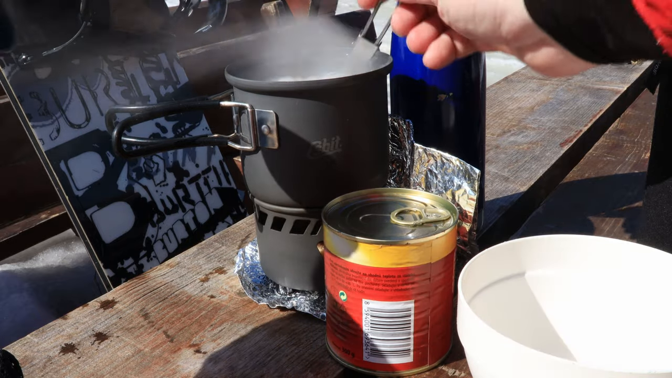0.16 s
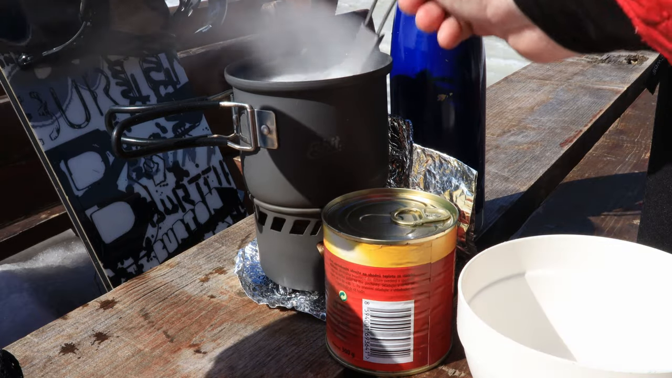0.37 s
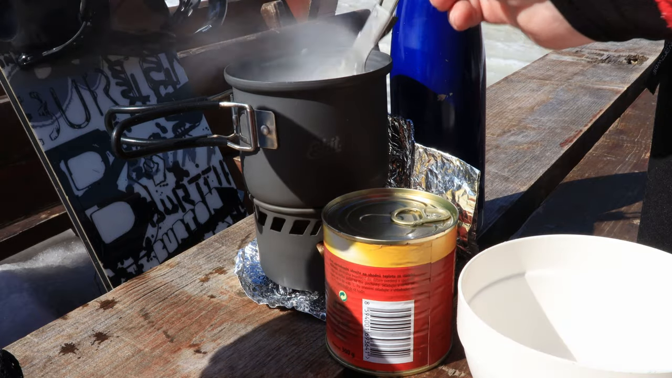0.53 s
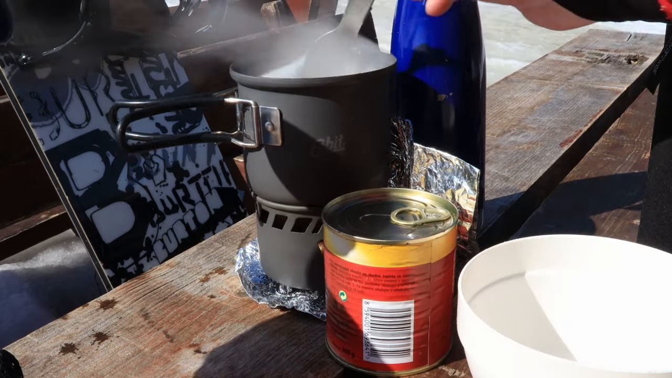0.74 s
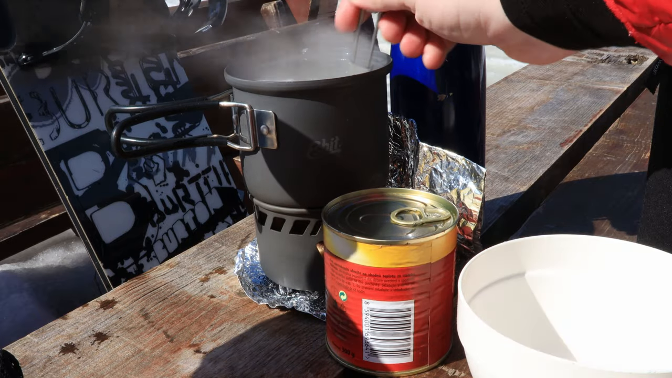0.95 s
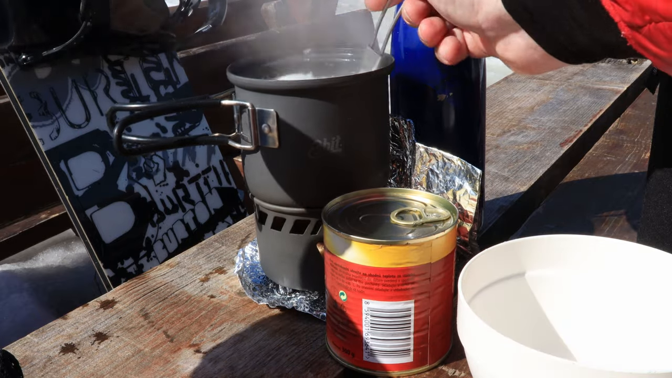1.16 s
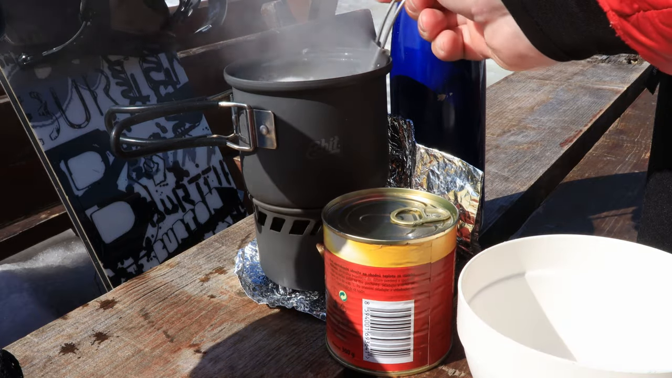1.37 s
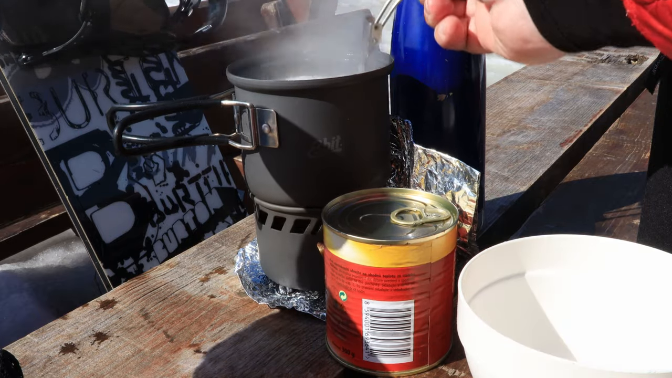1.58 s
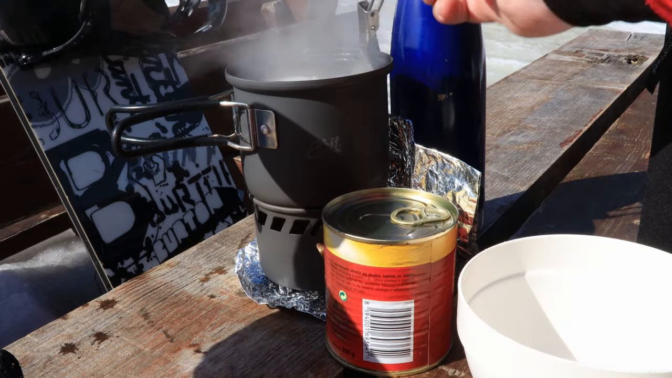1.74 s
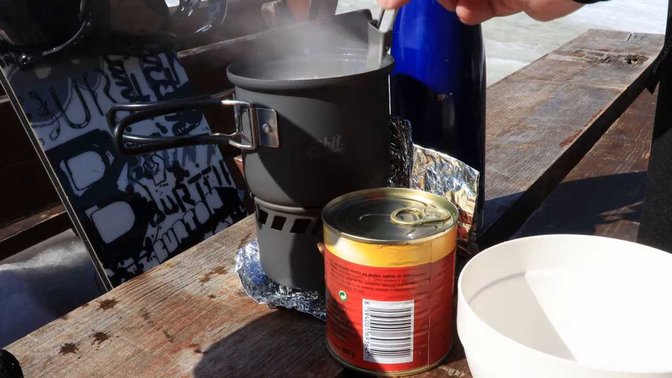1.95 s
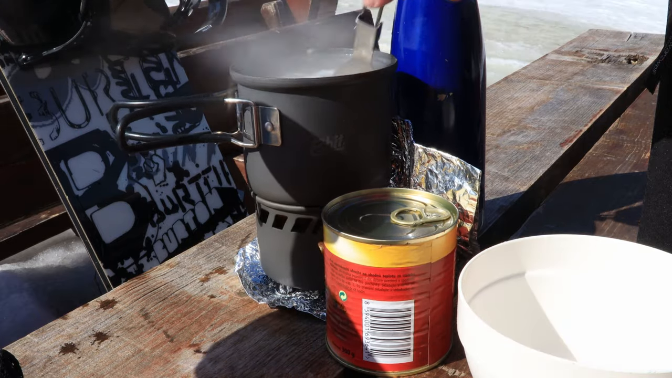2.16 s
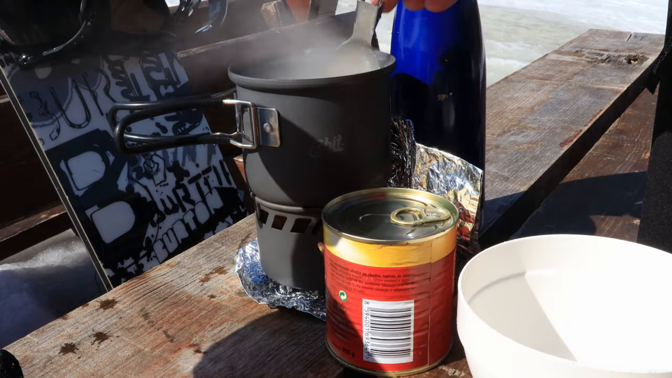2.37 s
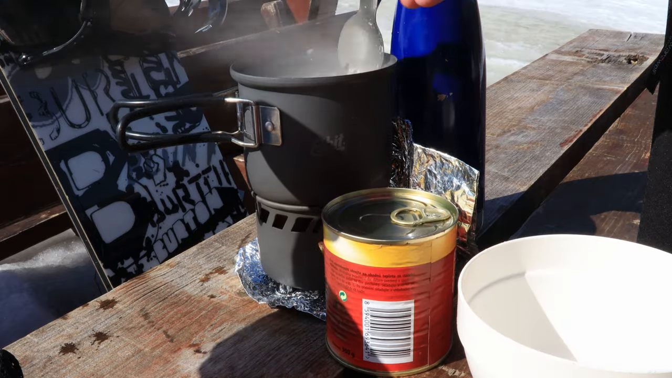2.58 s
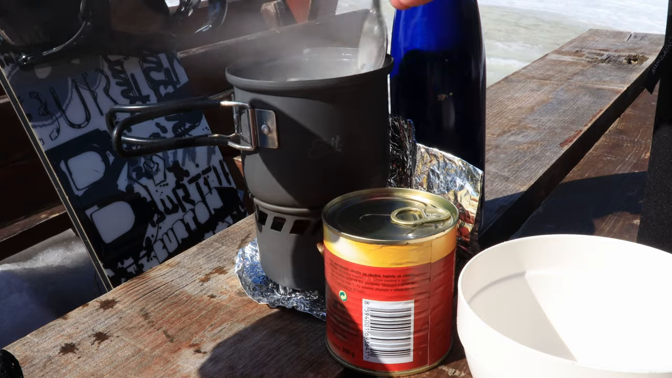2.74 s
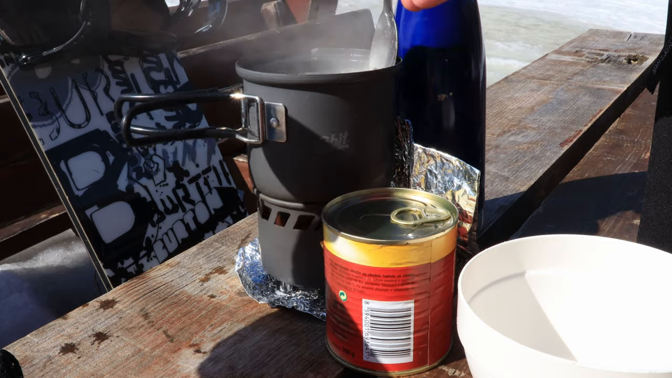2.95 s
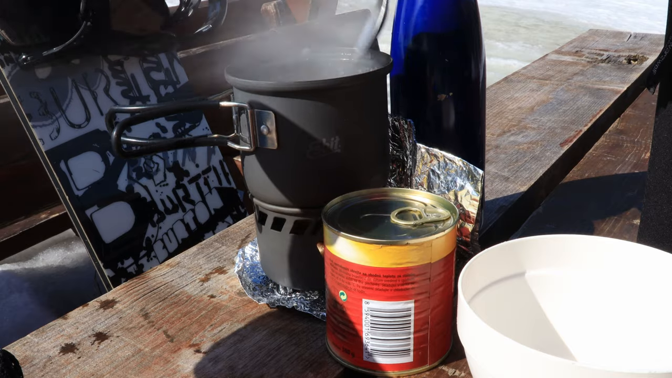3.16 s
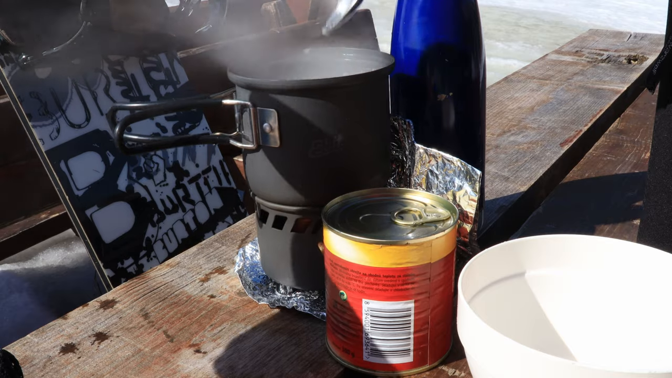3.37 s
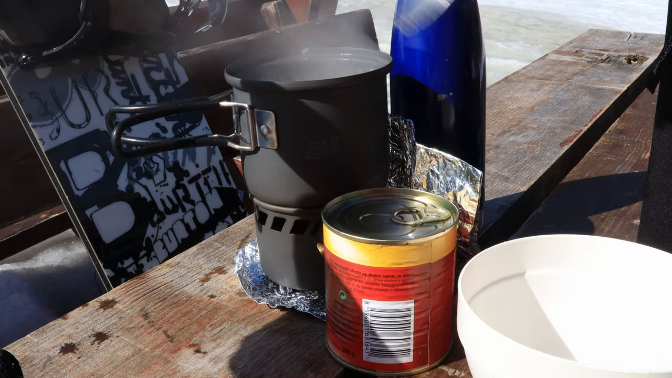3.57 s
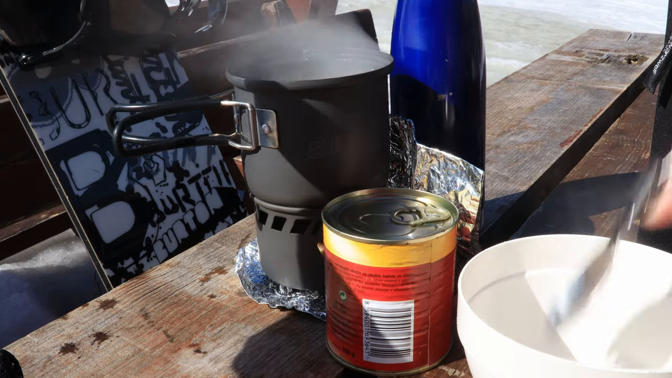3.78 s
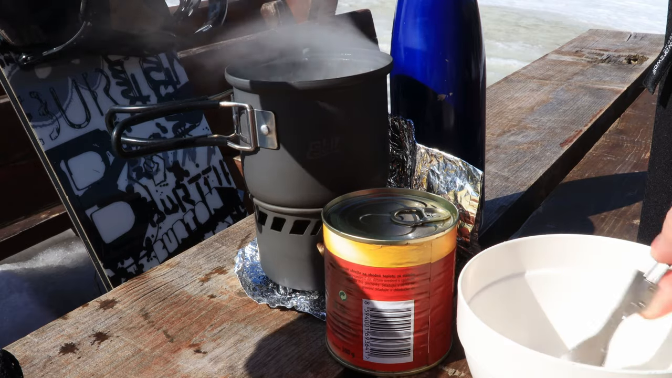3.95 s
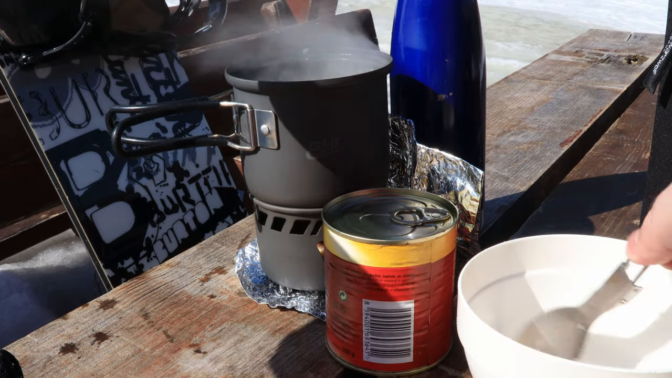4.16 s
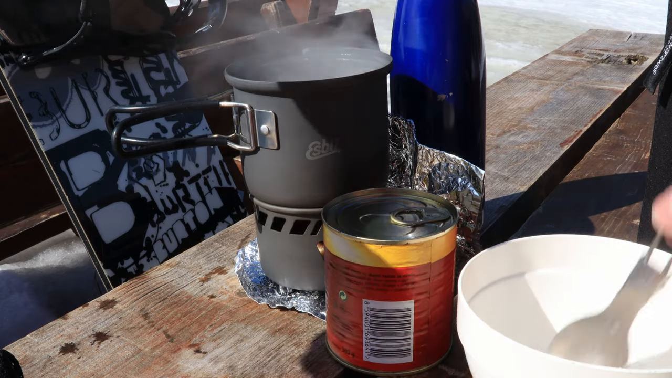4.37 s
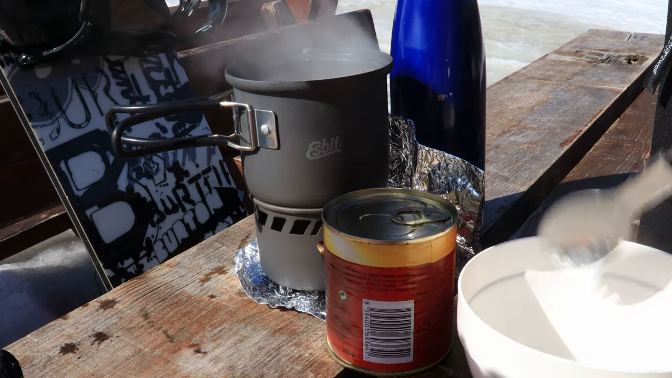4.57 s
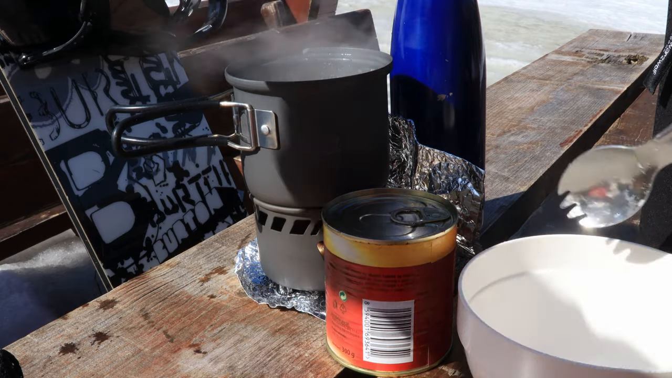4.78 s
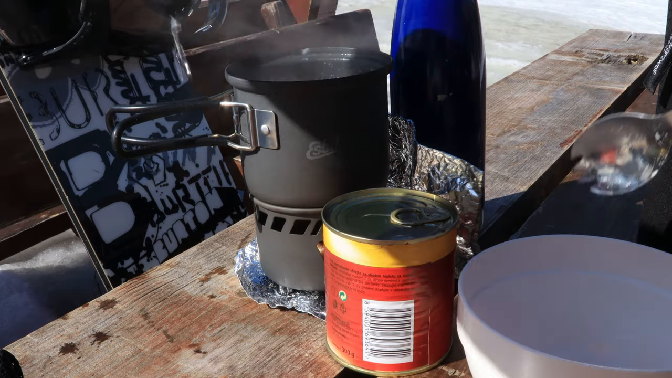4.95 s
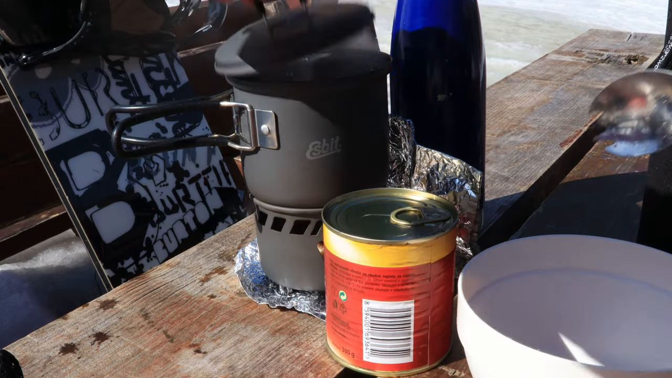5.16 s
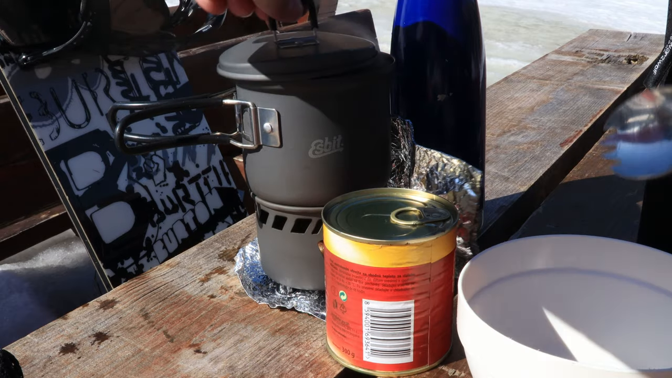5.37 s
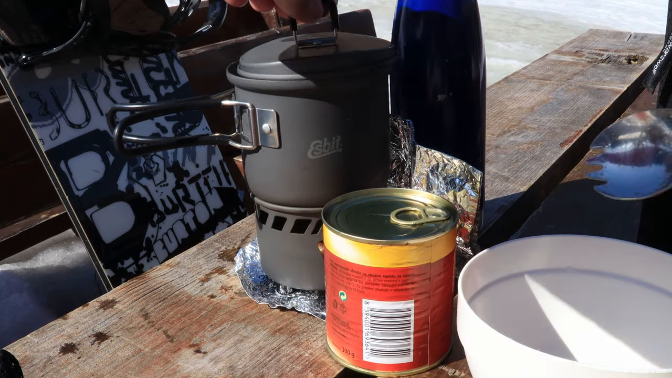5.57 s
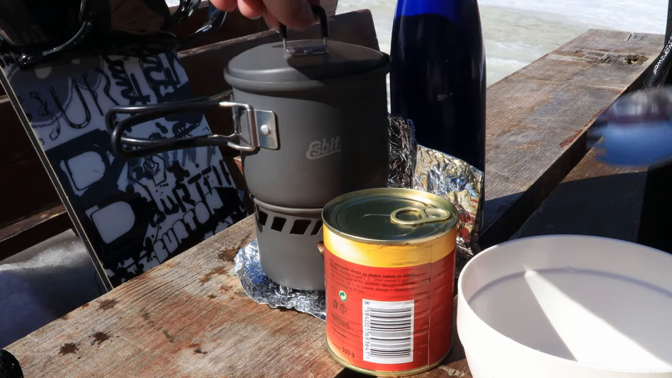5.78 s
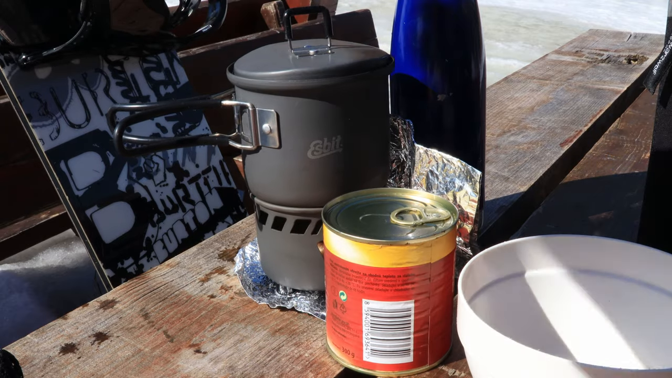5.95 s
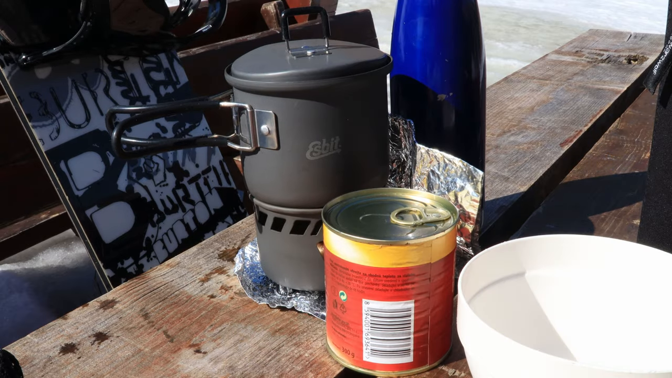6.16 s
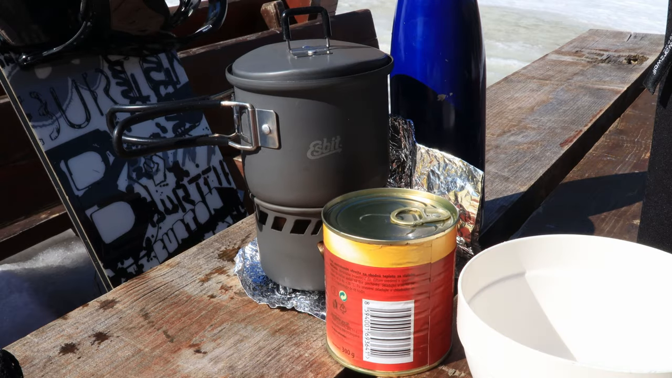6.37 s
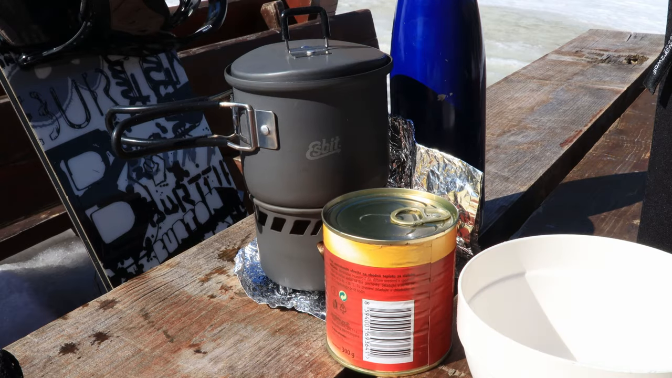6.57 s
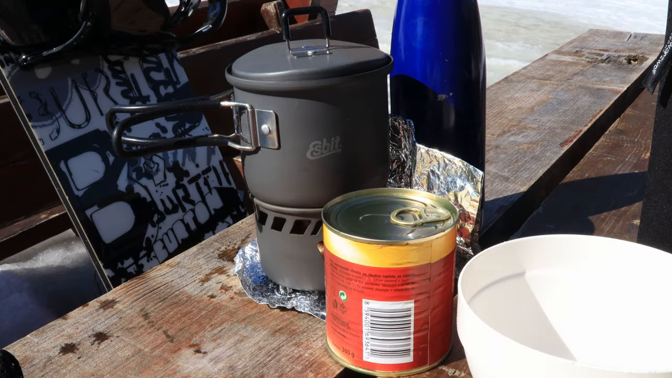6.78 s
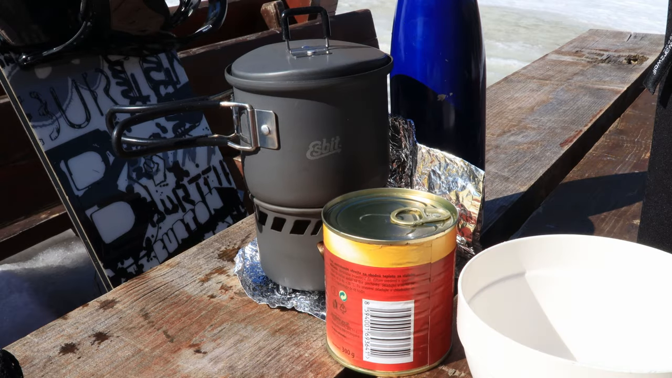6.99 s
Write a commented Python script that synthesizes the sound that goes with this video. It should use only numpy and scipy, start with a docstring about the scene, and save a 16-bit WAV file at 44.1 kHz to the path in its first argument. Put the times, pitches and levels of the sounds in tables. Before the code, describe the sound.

A spoon taps and scrapes in a metal camp pot over a fluttering stove, knocks a plastic bowl, then a metal lid clatters on.

```python
"""A camp stove flutters under a metal pot outdoors while a spoon taps, judders and scrapes round its wall.
The spoon knocks in a plastic bowl; then a metal lid clatters onto the rim, slides and settles.
Gusts hiss past and buffet the microphone and a nylon sleeve swishes, all close to a stereo camera.
Contacts ring banks of decaying modes; friction drives the same modes with rough noise or slips;
flame, air and cloth are shaped noise. Levels in dB are relative."""
import sys
import numpy as np
from scipy import signal
from scipy.fft import rfft, irfft, next_fast_len
from scipy.io import wavfile
from scipy.ndimage import map_coordinates

SR = 44100
rng = np.random.default_rng(int(sys.argv[2]) if len(sys.argv) > 2 else 0)


def digitize_waveform(pressure):
    """Quantize a signal to 16-bit integers and store it at the path in sys.argv[1].

    Rows of a 2-D input are taken as channels; values are limited to [-1, 1].
    """
    field = np.atleast_2d(pressure).T
    bounded = np.clip(field, -1, 1)
    quanta = np.round(bounded * 32767).astype(np.int16)
    wavfile.write(sys.argv[1], SR, quanta)


N = 309702
TIME_S = np.arange(N) / SR

# flame strength: time_s, rumble_db, flutter_db
FLAME_LEVELS = [(0.0, -53.5, -45), (0.81, -73.5, -68.5), (0.87, -82, -60), (1.11, -70, -64),
                (1.67, -73, -51.5), (2.29, -54.5, -51), (2.52, -68.5, -59), (3.9, -63.5, -65.5),
                (3.98, -57, -50), (4.19, -102, -61.5), (4.34, -50, -55), (4.44, -72.5, -63),
                (4.81, -52, -62.5), (4.91, -75, -77), (5.14, -58, -45), (5.2, -64.5, -68),
                (5.93, -53, -54.5), (6.16, -76, -74.5), (7.01, -51, -54.5)]
# broadband scratch spectrum: freq_hz, gain_db
SCRATCH_SPECTRUM = [(100, -1), (300, 6), (600, -2), (1500, 7), (4500, 2.5), (7000, 1), (11500, -5),
                    (13500, -10.5), (16000, -26)]
# pot wall, deadened by food and the pressing spoon: mode_hz, level_db, t60_s
WALL_MODES = [(298, -21, 0.19), (430, -19, 0.045), (672, -9.5, 0.028), (1090, -9, 0.0052),
              (1380, -9, 0.021), (1750, 8, 0.0075), (2104, 9, 0.0064), (2376, 9, 0.0062),
              (2860, 4.5, 0.0076), (3455, 9, 0.0069), (4670, -9, 0.009), (4840, 4.5, 0.0099),
              (6550, 1.5, 0.0084), (8240, -2.5, 0.014), (9260, -4, 0.024), (11350, -3.5, 0.019)]
# lid plate: mode_hz, level_db, t60_s
LID_MODES = [(353, -20.5, 0.11), (725, -13, 0.044), (1154, -10.5, 0.035), (1270, -6.5, 0.036),
             (1480, -7, 0.027), (1732, -7, 0.017), (2450, -8.5, 0.05), (2630, -8, 0.039),
             (3060, -1.5, 0.012), (3344, 3, 0.081), (3460, -3, 0.053), (3680, -10.5, 0.035),
             (3920, -9.5, 0.099), (4380, -9.5, 0.1), (4820, -10.5, 0.09), (7370, -20, 0.03),
             (6900, -14, 0.039), (7850, -12, 0.035), (8900, -19.5, .035), (9330, -15, 0.047),
             (9960, -17, 0.062), (10040, -14, 0.032), (11190, -17, 0.05), (11700, -15, 0.036),
             (12500, -20, 0.04)]
# lid radiation, three clusters with gaps between: freq_hz, gain_db
LID_RADIATION = [(450, 2.5), (800, -3.5), (1200, 0), (1750, 2), (2150, -3), (2600, -1), (4900, -0.5),
                 (5500, 1), (7000, -1), (10000, 0), (13000, -3.5)]


def amp(db):
    """Decibels to gain."""
    return 10 ** (np.asarray(db) / 20)


def unit(x):
    """Scale to rms 1."""
    return x / np.sqrt(np.mean(x ** 2) + 1e-20)


def blow_unit(x):
    """Scale so that all the energy, packed into 10 ms, has rms 1."""
    return x / np.sqrt(np.sum(x ** 2) / (SR / 100))


def along(points, hz):
    """Interpolate (Hz, value) points on a log frequency axis."""
    f, v = np.transpose(points)
    return np.interp(np.log(hz + 1), np.log(f + 1), v)


def curves(rows):
    """One value per sample for each column after the time."""
    s, *cols = np.transpose(rows)
    return [np.interp(TIME_S, s, c) for c in cols]


def wobble(rate):
    """A smooth random curve, rate knots a second."""
    knots = rng.standard_normal(int(N * rate / SR) + 4)
    return map_coordinates(knots, [np.arange(N) * rate / SR])


def waver(rate):
    """A smooth random curve without rare extremes."""
    return np.tanh(wobble(rate))


def filtered(x, response):
    """Apply a complex response of frequency."""
    n = x.shape[-1]
    m = next_fast_len(n + SR // 4)
    return irfft(rfft(x, m) * response(np.fft.rfftfreq(m, 1 / SR)), m)[..., :n]


def coloured(x, points, size=4096):
    """Causal minimum-phase filter with the gain of (Hz, dB) points."""
    cepstrum = irfft(np.log(amp(along(points, np.fft.rfftfreq(size, 1 / SR)))))
    cepstrum[1:size // 2] *= 2
    cepstrum[size // 2 + 1:] = 0
    impulse = irfft(np.exp(rfft(cepstrum)))
    return signal.fftconvolve(x, impulse)[:len(x)]


def noise(spectrum, size=N):
    """Coloured noise of rms 1."""
    return unit(filtered(rng.standard_normal(size), lambda hz: amp(along(spectrum, hz))))


def add(track, s, x):
    """Mix x into the track from time s."""
    i = max(round(s * SR), 0)
    track[i:i + len(x)] += x[:max(N - i, 0)]


def placed(x, image, echo_s, diffuse_db):
    """Stereo paths: direct with a phase lead, an opposed echo off the nearest tin, diffuse table scatter."""
    # thrown back by table and tins: freq_hz, gain_db
    scatter_spectrum = [(100, -18), (700, 4.5), (2000, 12), (5000, -4), (11500, -7), (16000, 6.5)]
    t = np.arange(SR // 10) / SR
    envelope = amp(-60 * t / 0.061) * (1 - np.exp(-t / 0.00071))
    scatter = np.array([blow_unit(noise(scatter_spectrum, size=len(t)) * envelope) for _ in range(2)])
    scatter /= np.linalg.norm(scatter[0])
    diffuse = signal.fftconvolve(x[None], scatter, axes=1)[:, :N]
    ports = np.array([[1], [-1]])

    def paths(hz):
        direct_db, echo_db, lead = [along(np.array(image)[:, [0, k]], hz) for k in range(1, 4)]
        direct = amp(direct_db) * np.exp(.5j * ports * lead)
        echo = ports * amp(echo_db) * np.exp(-2j * np.pi * hz * echo_s)
        return direct + echo
    return filtered(x, paths) + amp(diffuse_db) * diffuse


def surround(spectrum):
    """Noise from all around: alike in the bass, opposed in the treble."""
    # freq_hz, left_right_correlation
    likeness = [(100, 0.76), (300, 0.88), (640, 0.88), (1400, 0.42), (3100, -0.47), (6800, -0.76),
                (15000, -0.71)]

    def turn(hz):
        return np.arccos(np.clip(along(likeness, hz), -1, 1)) / 2
    mid = filtered(noise(spectrum), lambda hz: np.cos(turn(hz)))
    side = filtered(noise(spectrum), lambda hz: np.sin(turn(hz)))
    return unit(np.array([mid + side, mid - side]))


def ring(modes, grip=10, scatter_db=3, detune=0):
    """Struck modes; grip (t60 s) shortens them all, the contact point detunes the most damped."""
    t = np.arange(SR // 2) / SR
    hz, db, t60 = np.transpose(modes)[:, :, None]
    sign = (-1) ** np.arange(len(db))[:, None]
    strength = amp(db + scatter_db * rng.standard_normal(db.shape)) * sign
    hz = hz * (1 + detune * t60.min() / t60 * rng.standard_normal(hz.shape))
    decay = amp(-60 * t / t60 - 60 * t / grip)
    return blow_unit(np.sum(strength * decay * np.sin(2 * np.pi * hz * t), axis=0))


def crack(t60):
    """Countless weak modes, heard as a decaying burst of noise."""
    t = np.arange(SR // 2) / SR
    return blow_unit(noise(SCRATCH_SPECTRUM, size=len(t)) * amp(-60 * t / t60))


def snap():
    """The single sharp pulse of metal meeting metal."""
    # contact pulse: freq_hz, gain_db
    pulse_spectrum = [(150, -14), (700, -14), (1500, 8.5), (3000, 6.5), (6500, 5.5), (11000, -8),
                      (15000, -23.5)]
    return blow_unit(coloured(signal.unit_impulse(SR // 2), pulse_spectrum))


def contact(x, thud_db, clink_db, sparkle_db, hollow_db=0):
    """Place and hardness of a contact weight the modes; small objects radiate little bass."""
    return coloured(x, [(60, thud_db - 25.5), (280, thud_db), (950, thud_db), (1450, hollow_db),
                        (2500, 0.0032), (3500, clink_db), (6500, clink_db), (9000, sparkle_db)])


def grit(rough_db):
    """Friction force: noise in tiny clumps."""
    return unit(rng.standard_normal(N) * amp(rough_db * 2 * waver(350)))


def slipping(per_s, scatter_db):
    """Friction force: separate slips at an uneven rate."""
    turns = np.floor(np.cumsum(per_s * np.exp(.35 * wobble(90))) / SR)
    return unit(np.diff(turns, prepend=0) * amp(scatter_db * waver(120)))


def rubbed(force, modes, grip, hiss_db):
    """Friction hisses and rings an object's modes; their mix drifts as the contact travels."""
    here, there = [unit(signal.fftconvolve(force, ring(modes, grip, detune=.02))[:N]) for _ in range(2)]
    travel = wobble(15)
    hiss = unit(coloured(force, SCRATCH_SPECTRUM))
    return np.cos(travel) * here + np.sin(travel) * there + amp(hiss_db) * hiss


def stroke(start, length, attack_s, release_s, swell_db):
    """Gain of one sliding stroke: it grips, bows by swell_db about its middle and lets go."""
    t = TIME_S - start
    contact_share = np.clip(np.minimum(t / attack_s, (length - t) / release_s), 0, 1)
    return contact_share * amp(-swell_db * np.clip(2 * t / length - 1, -1, 1) ** 2)


def puffs(rows):
    """Each puff is a brief soft pressure swing with turbulence clustered round it."""
    cycles = 0.53
    out, t = np.zeros(N), np.arange(-SR // 40, SR // 40) / SR
    for s, db, hz in rows:
        core = np.cos(2 * np.pi * (hz * t + rng.uniform())) / np.cosh(2 * hz * t / cycles)
        eddy_spectrum = [(hz / 4, -20), (hz, 0), (2 * hz, -4), (4 * hz, -26), (10 * hz, -120)]
        eddies = noise(eddy_spectrum, size=len(t)) * np.exp(-(t / 0.0077) ** 2)
        puff = amp(db) * (core + amp(-18.5) * eddies)
        add(out, s + t[0], puff[t > -s])
    return out


def air():
    """A soft hiss; each gust rises quickly out of the calm and dies away slowly."""
    # crest_s, hiss_db, fall_db_per_s
    gust_rows = [(0, -61.5, 22), (3.599, -53, 39), (5.02, -52, 8), (6.13, -49.5, 20)]
    # freq_hz, density_db_per_hz
    air_spectrum = [(20, -16.5), (100, -11.5), (400, 2), (1300, 1.5), (2000, -1), (2700, -1), (5000, -4.5),
                    (8000, -7.5), (11500, -8), (13500, -17), (16000, -37)]
    rise_db_per_s, calm_db = 50.5, -62
    gusts = [amp(db - np.maximum(rise_db_per_s * (s - TIME_S), fall * (TIME_S - s)))
             for s, db, fall in gust_rows]
    level = np.sqrt(amp(calm_db) ** 2 + np.sum(np.square(gusts), axis=0))
    return level * amp(0.46 * wobble(2.2)) * surround(air_spectrum)


def on_ports(x, side):
    """Wind weighs more on one port: side from -1 left to 1 right."""
    # right-over-left difference at side 1: freq_hz, difference_db
    windward = [(70, 1.5), (130, 2.5), (250, 11), (500, 17)]
    return filtered(x, lambda hz: amp(side * np.outer([-.5, .5], along(windward, hz))))


def buffeting():
    """After the last gust's crest, turbulent wind rumbles and thumps on the microphone ports."""
    # start_s, length_s, level_db, side (-1 left to 1 right)
    buffet_rows = [(6.204, 0.16, -40.5, 0.85), (6.359, 0.3, -41, 0.68), (6.712, 0.298, -41, -0.75)]
    # freq_hz, density_db_per_hz
    buffet_spectrum = [(12, -31), (22, -16.5), (48, 3), (120, -1), (190, -4), (390, -29.5), (900, -56.5)]
    # mostly right port: time_s, peak_db, pitch_hz
    thump_rows = [(6.405, -26, 193), (6.423, -29, 200), (6.478, -26.5, 233)]
    turbulence = unit(noise(buffet_spectrum) * amp(5.6 * wobble(33)))
    out = on_ports(puffs(thump_rows), 0.94)
    for s, length, db, side in buffet_rows:
        gain = amp(db) * stroke(s, length, attack_s=0.0257, release_s=0.084, swell_db=0.5)
        out += on_ports(gain * turbulence, side)
    return out


def sleeve():
    """Nylon brushes briefly as the arm moves: noise in Gaussian swells."""
    # centre_s, sigma_s, level_db
    swish_rows = [(5.211, 0.018, -39.5), (6.806, 0.019, -49.5)]
    # freq_hz, density_db_per_hz
    nylon_spectrum = [(300, -28), (900, -2), (2500, -4.5), (6000, -0.5), (9000, 2), (11300, 3.5),
                      (13000, -6), (16000, -27.5)]
    level = sum(amp(db) * np.exp(-.5 * ((TIME_S - s) / sigma) ** 2) for s, sigma, db in swish_rows)
    return level * surround(nylon_spectrum)


def small_puffs(count):
    """Rows (s, peak dB, Hz) at random moments: stronger and sharper where the flame flutters more."""
    over_flutter_db, scatter_db = 12.5, 4.5
    centre_hz, octaves_per_db = 213, 0.07
    s = rng.uniform(0, N / SR, count)
    size, pitch = rng.standard_normal((count, 2)).T
    times, _, flutter_db = np.transpose(FLAME_LEVELS)
    db = np.interp(s, times, flutter_db)
    octaves = octaves_per_db * (db - flutter_db.mean()) + .45 * pitch
    return list(zip(s, db + over_flutter_db + scatter_db * size, centre_hz * 2 ** octaves))


def flame():
    """The burner rumbles, flutters and puffs: two wavering noise bands plus pressure swings."""
    # largest puffs: time_s, peak_db, pitch_hz
    large_puffs = [(0.012, -18.5, 395), (.106, -32, 402), (.154, -28, 222), (.203, -35, 250),
                   (.216, -28.5, 352), (0.24, -29, 350), (0.262, -31, 440), (0.355, -27.5, 268),
                   (.367, -29.5, 318), (.397, -29, 204), (.657, -33.5, 253), (0.888, -30.5, 215),
                   (1.045, -30, 277), (1.449, -34, 300), (1.511, -31.5, 342), (1.536, -23, 270),
                   (1.625, -32, 289), (1.633, -20, 370), (1.667, -27.5, 261), (1.715, -28, 240),
                   (1.792, -28.5, 270), (1.883, -28.5, 420), (1.915, -29.5, 250), (1.987, -35, 386),
                   (2.066, -25.5, 300), (2.205, -31, 300), (2.284, -29.5, 510), (2.3, -19.5, 395),
                   (3.124, -36.5, 322), (3.646, -30, 325), (3.755, -26.5, 256), (4.339, -30, 242),
                   (4.701, -29.5, 195), (5.071, -31.5, 270), (5.135, -25.5, 318), (5.915, -27.5, 242),
                   (6.947, -19.5, 370), (6.963, -28.5, 302)]
    # freq_hz, density_db_per_hz
    rumble_spectrum = [(15, -27.5), (30, -19), (55, 0), (90, 5.5), (140, -7), (250, -17), (600, -60)]
    # freq_hz, density_db_per_hz
    flutter_spectrum = [(60, -12), (130, 1), (220, -3), (350, -9.5), (550, -16.5), (900, -27),
                        (2000, -87.5)]
    # freq_hz, direct_db, echo_db, left_lead_rad
    image = [(39.7, 0.0041, -57, 0.019), (250, 0.0011, -44.5, -0.06), (800, 0, -11, -.15)]
    rumble_db, flutter_db = curves(FLAME_LEVELS)
    rumble = unit(noise(rumble_spectrum) * amp(3.7 * wobble(11)))
    flutter = unit(noise(flutter_spectrum) * amp(4.5 * wobble(55)))
    out = amp(rumble_db + 3.5) * rumble + amp(flutter_db + 3) * flutter
    out += puffs(large_puffs + small_puffs(count=220))
    flame_balance = amp([[-.25], [.25]])  # the flame leans 0.5 dB to the right
    return placed(out, image, echo_s=0.0047, diffuse_db=-17.5) * flame_balance


def spoon_in_bowl():
    """Hollow knocks on plastic, each with a faint buzz after it, and a few short skids."""
    # time_s, level_db, thud_db, clink_db, sparkle_db, spoon_grip_t60_s, lowest_mode_hz
    knock_rows = [(3.9854, -19.5, -2.5, 1, -1, 0.43, 291), (3.999, -34.5, -6, -5, -16, 0.36, 291),
                  (4.045, -48, 1, -4, -8, 0.21, 300), (4.1084, -45.5, -10, 9, 23, 0.04, 400),
                  (4.1124, -26, 1, 3, 3, 0.072, 409), (4.2408, -48.5, 17.5, 1, 3, 0.11, 412),
                  (4.2981, -31, 2, 2.5, -1.5, 0.035, 313), (4.307, -40.5, 1.5, 0, -6, 0.12, 313),
                  (4.3141, -42, 3, -5, -14, 0.33, 302), (4.372, -46, -14, -2.5, -20, .1, 300)]
    # start_s, length_s, level_db
    skid_rows = [(4.199, 0.058, -53), (4.33, 0.056, -52), (4.386, 0.043, -51.5)]
    # mode_hz, level_db, t60_s
    bowl_modes = [(405, -11.5, 0.057), (575, -6, 0.013), (894, -7, 0.013), (1103, -9.5, 0.06),
                  (1335, 2.5, 0.0071), (1875, -0.5, 0.021), (2075, -7, 0.05), (2600, -19, 0.035),
                  (3060, -8, 0.042), (3930, -0.5, 0.018), (5000, -14, 0.033), (5420, -3.5, 0.019),
                  (6100, -17, 0.02), (7850, -5, 0.016)]
    # freq_hz, direct_db, echo_db, left_lead_rad
    image = [(300, 0.5, -31, 0.000019), (1000, 2, -37, 0.25), (2060, -3.5, -1, -0.031),
             (3970, -5.5, -1.5, -1.4), (9000, -7, -2, -1.53)]
    base_db, base_t60_s = -4, 0.12  # lowest mode; its pitch shifts with where the spoon bears
    pressure = sum(amp(db) * stroke(s, length, attack_s=0.012, release_s=0.012, swell_db=-4)
                   for s, length, db in skid_rows)
    out = pressure * unit(rubbed(grit(rough_db=-1.5), bowl_modes, grip=0.012, hiss_db=0))
    for s, db, thud_db, clink_db, sparkle_db, grip, base_hz in knock_rows:
        all_modes = [(base_hz, base_db, base_t60_s)] + bowl_modes
        body = ring(all_modes, grip, scatter_db=1.5, detune=0.012)
        plastic = body + amp(-2.5) * crack(0.015) + amp(-25.5) * crack(0.36)
        add(out, s, amp(db) * contact(plastic, thud_db, clink_db, sparkle_db))
    return placed(out, image, echo_s=0.000835, diffuse_db=-17.5)


def lid_grating():
    """The lid grates along the rim: rapid slips and grit ring its modes."""
    # start_s, length_s, level_db, hollow_db
    grate_rows = [(5.327, 0.11, -35, -2), (5.428, 0.11, -43.5, -3), (5.67, 0.088, -41.5, 3),
                  (5.738, 0.15, -49.5, -8), (5.832, 0.048, -41, 0.5), (5.865, 0.076, -42.5, -0.5)]
    # freq_hz, gain_db
    grate_colour = [(400, 4), (900, -3), (1250, 1.5), (1700, 6), (2400, -5.5), (3400, -2.5), (4300, 3.5),
                    (7000, 6.5), (12000, 6.5)]
    chatter = slipping(per_s=390, scatter_db=5) + .3 * grit(rough_db=2)
    grating = rubbed(chatter, LID_MODES, grip=0.04, hiss_db=-12)
    grating = unit(coloured(coloured(grating, grate_colour), LID_RADIATION))
    hollow = filtered(grating, lambda hz: 1 / (1 + (hz / 2400) ** 6))
    out = np.zeros(N)
    for s, length, db, hollow_db in grate_rows:
        gain = amp(db) * stroke(s, length, attack_s=0.016, release_s=0.058, swell_db=4)
        out += gain * (grating + (amp(hollow_db) - 1) * hollow)
    return out


def lid():
    """The held lid clanks and grates; the pot's rim and the lid ring on until it is seated."""
    # time_s, level_db, thud_db, clink_db, sparkle_db, hand_grip_t60_s, pot_ring_db
    clank_rows = [(5.0141, -42.5, 2, -17, -15, 0.0097, -30), (5.317, -23.5, 0.5, 4, 14.5, 0.33, -31),
                  (5.3288, -20, 1.5, 3, 8, 0.42, -36), (5.3413, -32.5, 1, 8, 14, 0.3, -31),
                  (5.4644, -46, -7, 7.5, 7, 0.045, -46), (5.4916, -35.5, 5, -3, 7, 0.15, -33),
                  (5.5034, -31.5, 3, 9, 13, 0.15, -1), (5.6300, -19, -6, -2, 1, 0.087, -20),
                  (5.6458, -17, -1, 2.5, 6, 0.043, -30), (5.7021, -39, 0, -1.5, -8, .08, -7),
                  (5.76, -38.5, 18, -1, 11, 0.55, 0.5), (5.8438, -38.5, 10, -9, 2, 0.06, -25),
                  (5.8736, -26.5, -0.5, -2, -4, 0.033, -14.5), (5.8824, -42, 2, 1, -12, 0.047, -25),
                  (5.908, -37.5, 7, -2.5, -26, 0.08, -29), (5.921, -32, -29, -13, -7, .1, -30),
                  (5.926, -39.5, 8, -4, 1, 0.062, -36)]
    # mode_hz, level_db, t60_s
    pot_modes = [(752, -3, 0.2), (2370, -4, 0.43), (4600, 1.5, 0.26), (7100, -5.5, 0.15),
                 (7530, -14.5, .08), (8100, -7.5, 0.03), (11180, 0, 0.096)]
    # lid tips free after a hard clank and sings: time_s, level_db
    free_rings = [(5.6456, -28), (5.877, -36)]
    # mode_hz, level_db, t60_s
    free_modes = [(4810, 0, 0.15), (7070, -24, 0.1)]
    # freq_hz, direct_db, echo_db, left_lead_rad
    image = [(200, -2, -26, 0.032), (1500, 0.5, -25, .14), (3500, -1, -9, .2), (5950, -5.5, -8.5, 0.65),
             (9100, -6.5, -3, 0.53)]
    seated_s, seated_t60_s = 5.93, 0.14
    out, ringing = lid_grating(), np.zeros(N)
    for s, db, thud_db, clink_db, sparkle_db, grip, pot_db in clank_rows:
        metal = ring(LID_MODES, grip, scatter_db=2, detune=.012)
        metal = coloured(metal + amp(-9.0) * crack(0.042), LID_RADIATION)
        add(out, s, amp(db) * contact(metal, thud_db, clink_db, sparkle_db))
        add(ringing, s, amp(db + pot_db) * ring(pot_modes, scatter_db=2.0))
    for s, db in free_rings:
        add(ringing, s, amp(db) * ring(free_modes, scatter_db=3.0))
    choke_db = -60 * np.maximum(TIME_S - seated_s, 0) / seated_t60_s
    waver_db = 3.8 * waver(35)  # the ringing wavers in level, as close pairs of modes beat
    out += ringing * amp(choke_db + waver_db)
    return placed(out, image, echo_s=0.000818, diffuse_db=-13.0)


def pot_taps():
    """Dead taps: wall modes, the struck spot, the spoon's own ring, a contact pulse and noise tails."""
    # time_s, level_db, thud_db, clink_db, sparkle_db, hollow_db, spot_hz, spoon_hz
    tap_rows = [(0.1, -59, 25.5, -3, -19, 8.5, 1390, 9300), (.842, -32.5, -2, -4.5, -7.5, -3.5, 1930, 8200),
                (0.888, -59.5, 18, 6, 5, 10, 1800, 9300), (1.007, -26.5, 6, -3, 4, 7, 900, 9450),
                (1.0592, -43, -2, -7, -4, -2, 1810, 9300), (1.1265, -19.5, -22, -11, -9, -22.5, 2430, 8100),
                (1.343, -60, -15, 0, 9.5, -8, 2400, 9350), (1.507, -45.5, -18, -7, 7.5, 1, 1890, 9300),
                (1.545, -42, -13, 5.5, 13, 0.5, 2020, 9500), (1.8671, -30, -7, -1.5, -0.5, 2, 1560, 9400),
                (1.906, -47.5, 5, -8, -4, 4, 1830, 9300), (2.8155, -28, -8.5, 10.5, 11, -2, 3320, 8300),
                (3.148, -48.5, 7, 3, 14, -5, 5000, 9400), (3.1602, -29.5, -4.5, -6, 7.5, -0.5, 1850, 9300)]
    out, pulse = np.zeros(N), snap()
    for s, db, *colour, spot_hz, spoon_hz in tap_rows:
        spot = amp(-3.5) * ring([(spot_hz, 0, 0.0069)])
        spoon = amp(-18) * ring([(spoon_hz, 0, 0.036)])
        wall = amp(-1.0) * ring(WALL_MODES, scatter_db=1.0, detune=0.034)
        noise_tails = amp(-3) * crack(0.022) + amp(-20.5) * crack(0.089)
        tap = wall + spot + spoon + amp(-7) * pulse + noise_tails
        add(out, s, amp(db - 3) * contact(tap, *colour))
    return out


def pot_ticks():
    """The pressed spoon catches on the wall and jumps, each jump a short damped tick."""
    # time_s, level_db
    tick_rows = [(1.6147, -54), (1.634, -47), (1.648, -59), (1.661, -51), (1.6712, -50.5), (1.6872, -52),
                 (1.696, -47.5), (1.7074, -51), (1.7138, -53), (1.731, -47.5), (1.748, -51), (1.763, -51),
                 (1.769, -50.5), (1.7762, -50), (1.7862, -50.5), (1.802, -51), (1.808, -50), (1.8202, -51)]
    out, pulse = np.zeros(N), snap()
    for s, db in tick_rows:
        wall = ring(WALL_MODES, grip=0.012, detune=0.12)
        tick = wall + amp(2) * pulse + amp(-5.5) * crack(0.014) + amp(-1) * ring([(5250, 0, .012)])
        tick = contact(tick, thud_db=11, clink_db=-4.5, sparkle_db=1.5, hollow_db=5.0)
        add(out, s, amp(db) * blow_unit(tick))
    return out


def pot_scrapes():
    """Spoon drawn round the wall: light glide, stick-slip judder and a narrow wandering rasp."""
    # start_s, length_s, level_db, stick_slip_share (0-1), treble_db, rasp_hz
    scrape_rows = [(0.821, 0.18, -58.5, 0.8, 3, 8100), (1.161, 0.097, -54, 0.2, -22, 2350),
                   (1.526, 0.14, -58.5, 0.2, 5, 5340), (1.583, 0.248, -52, 0.96, 2, 5260),
                   (1.897, 0.13, -58.5, 0.44, 3, 10900), (2.021, 0.081, -59.5, 0, 2.5, 8050),
                   (2.099, 0.17, -51.5, 0.15, -2, 4770), (2.286, 0.21, -61, 0.1, 4.5, 8000),
                   (2.464, 0.19, -57, 0, 5.5, 8050), (2.664, 0.065, -64, 0.03, 1, 8100),
                   (2.847, 0.076, -58.5, 0, 7, 6500), (3.084, 0.066, -50, 0.5, -2, 5150)]
    # freq_hz, gain_db
    judder_colour = [(400, 17), (800, 13), (1250, 6), (1750, 5.5), (2600, -3.5), (3500, 4), (4000, -18),
                     (5000, 3), (6300, 2), (8000, 3), (11000, 6)]
    # freq_hz, gain_db
    glide_colour = [(900, -15), (1800, -1.5), (2800, 2.5), (3500, 6.5), (4700, 2), (6300, 3.5),
                    (8000, 10.5), (9300, 6.5), (11300, 9.5), (13000, 8)]
    treble_hz, rasp_width_hz, glide_swell_db = 5400, 250, 13
    slips = slipping(per_s=97, scatter_db=4.5) + .3 * grit(rough_db=3)
    judder = unit(coloured(rubbed(slips, WALL_MODES, grip=.012, hiss_db=2), judder_colour))
    glide = unit(coloured(rubbed(grit(rough_db=3.2), WALL_MODES, grip=.014, hiss_db=2), glide_colour))
    glide *= amp(2 * wobble(30.31))  # uneven hand
    treble = filtered(glide, lambda hz: hz ** 4 / (hz ** 4 + treble_hz ** 4))
    narrow = filtered(rng.standard_normal(N), lambda hz: 1 / (1 + (hz / rasp_width_hz) ** 2))
    narrow = amp(-8.5) * unit(narrow)
    travel_s = np.cumsum(1 + .018 * wobble(12)) / SR  # drifts the rasp as the contact travels
    out = np.zeros(N)
    for s, length, db, share, treble_db, rasp_hz in scrape_rows:
        share = np.clip(share, 0, 1)
        light = glide + (amp(treble_db) - 1) * treble
        friction = np.sqrt(share) * judder + np.sqrt(1 - share) * light
        friction += narrow * np.sin(2 * np.pi * rasp_hz * travel_s)
        swell_db = glide_swell_db * (1 - share)  # a glide swells in mid-stroke, a judder stays even
        out += amp(db) * stroke(s, length, 0.028, 0.013, swell_db) * friction
    return out


def pot_stir():
    """The spoon rubs the bottom, muffled by the food."""
    # freq_hz, gain_db
    stir_colour = [(500, -15), (1150, -9), (1370, 2), (1650, -11), (3000, -31), (8000, -51)]
    gain = amp(-66) * stroke(0.014, 0.43, attack_s=0.028, release_s=0.3, swell_db=-2)
    return gain * unit(coloured(grit(rough_db=-1), stir_colour))


def spoon_in_pot():
    """All contacts of spoon and pot, on one path to the microphone."""
    # freq_hz, direct_db, echo_db, left_lead_rad
    image = [(100, 8.5, -26, 0), (704, 3.5, -33, 0.0085), (1520, 1.5, -38, 0.17), (3500, -1.9, -3, -1.07),
             (5940, -4.5, -10, -0.98), (9100, -8, -2.5, -0.64)]
    out = pot_taps() + pot_ticks() + pot_scrapes() + pot_stir()
    return placed(out, image, echo_s=0.000506, diffuse_db=-22.5)


def scene():
    """Everything on and around the table; the lid leans 1.6 dB to the left."""
    background = air() + buffeting() + sleeve() + flame()
    return background + spoon_in_bowl() + lid() * amp([[.8], [-.8]]) + spoon_in_pot()


def record(dry):
    """The camera's steep band limit at 16.2 kHz."""
    return filtered(dry, lambda hz: 1 / (1 + (hz / 16200) ** 120))


dry = scene()
out = record(dry)
digitize_waveform(out)
```